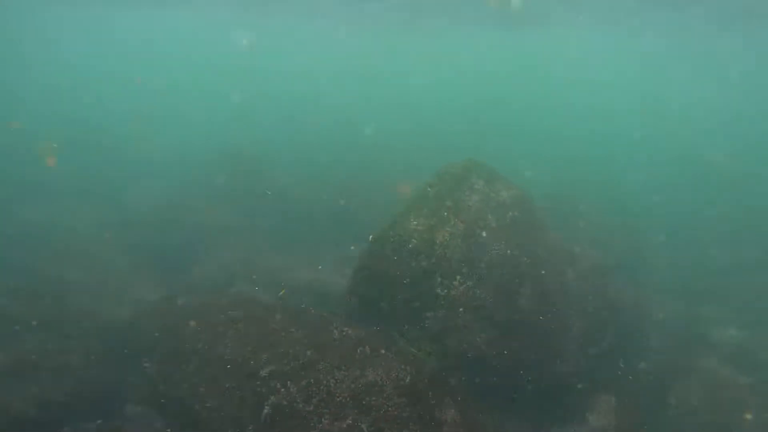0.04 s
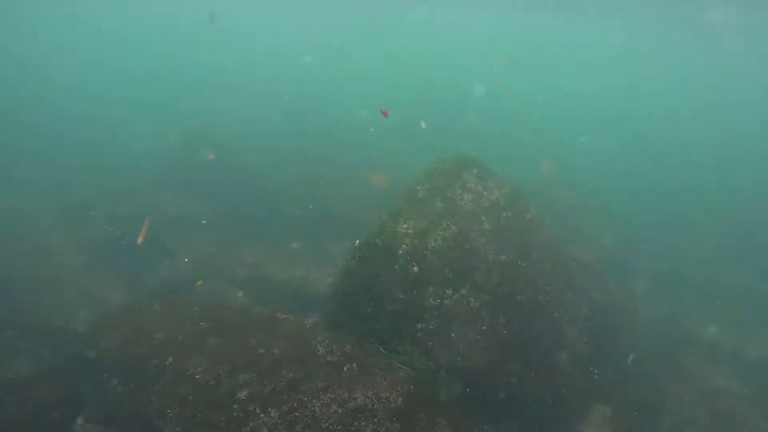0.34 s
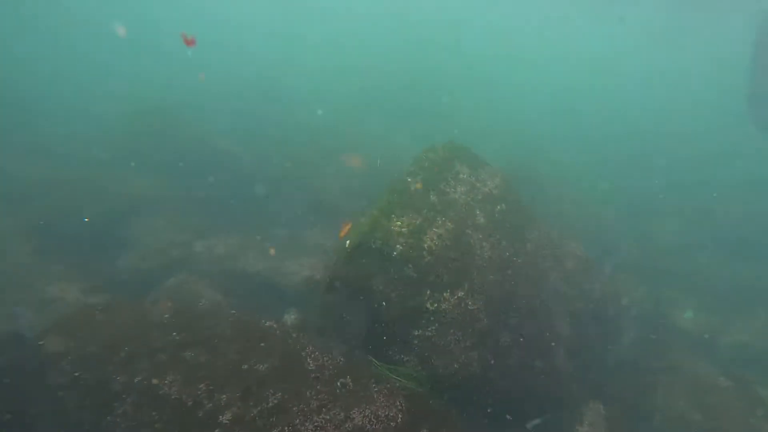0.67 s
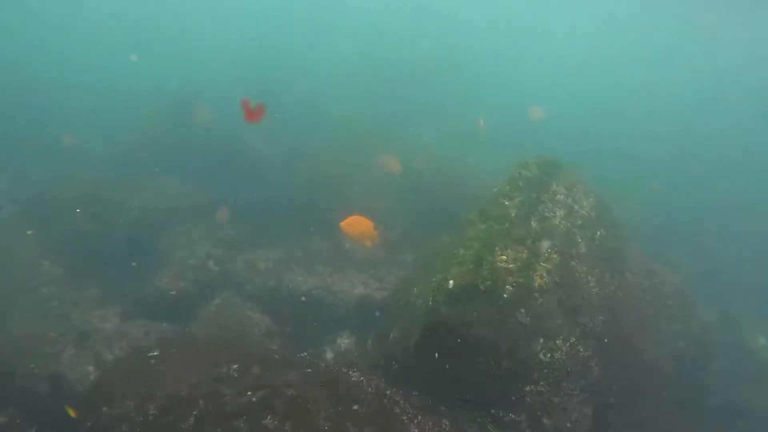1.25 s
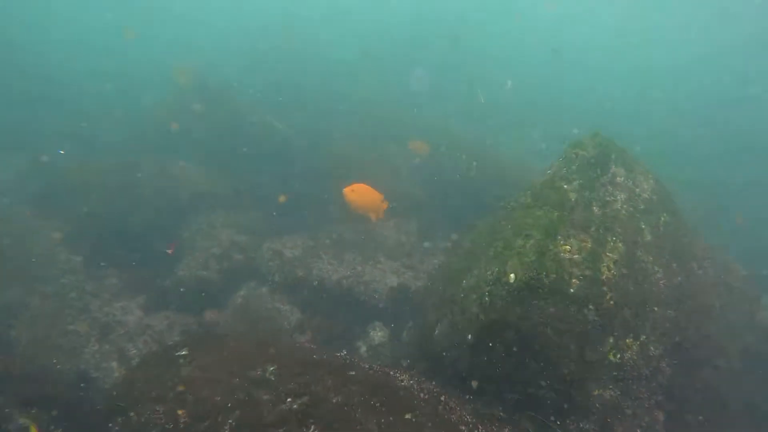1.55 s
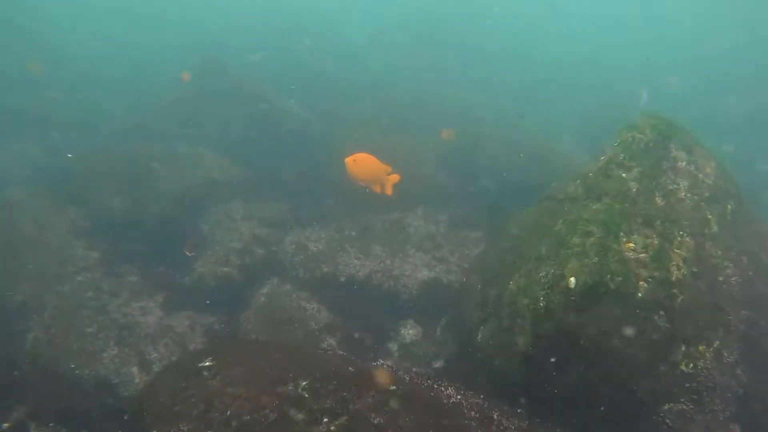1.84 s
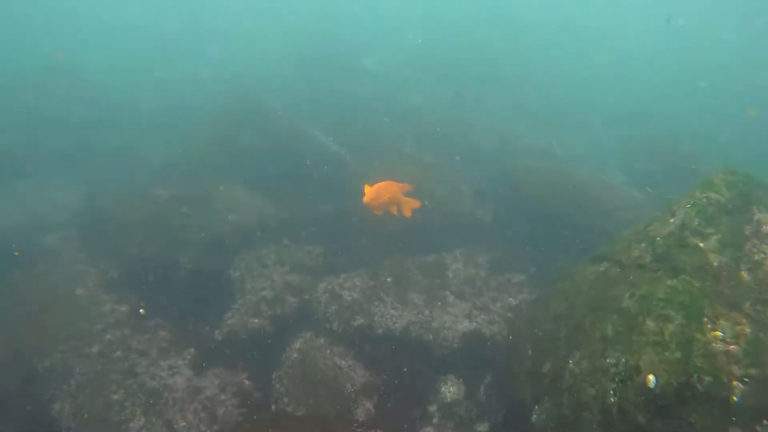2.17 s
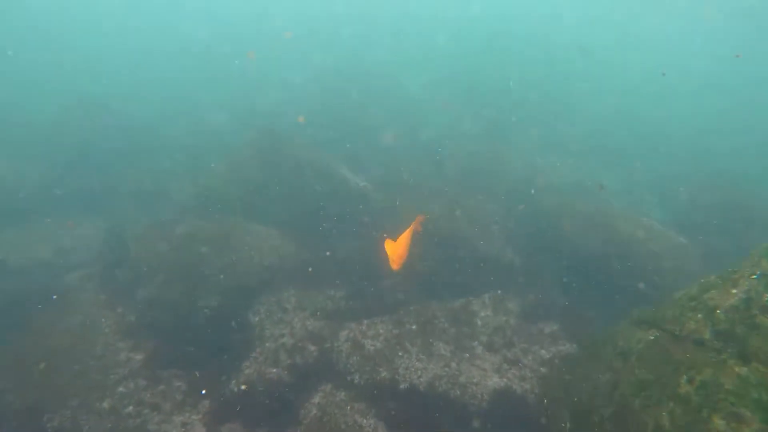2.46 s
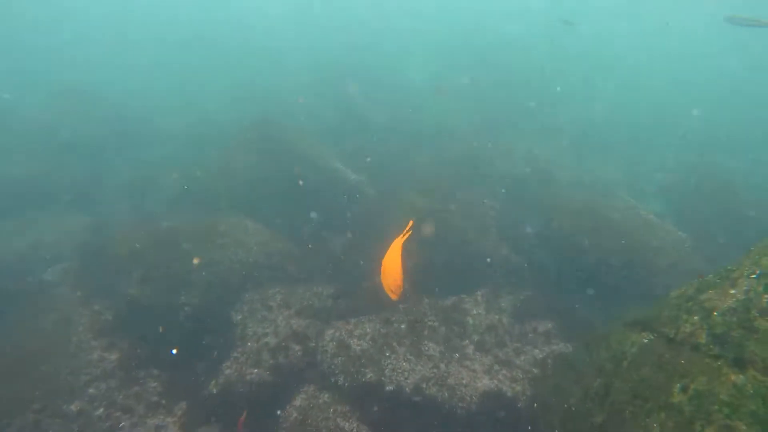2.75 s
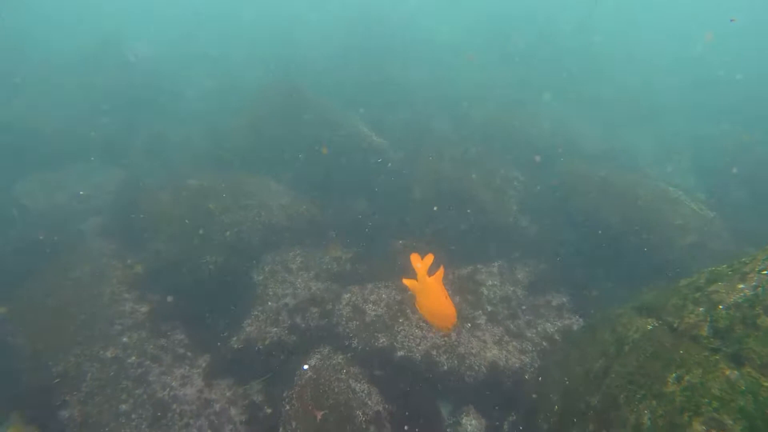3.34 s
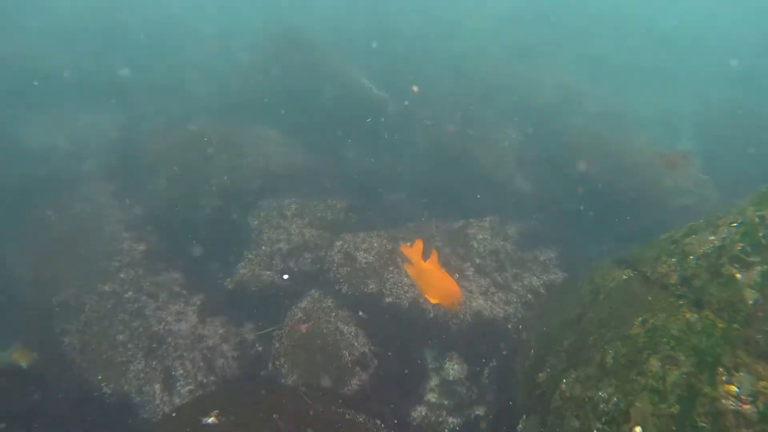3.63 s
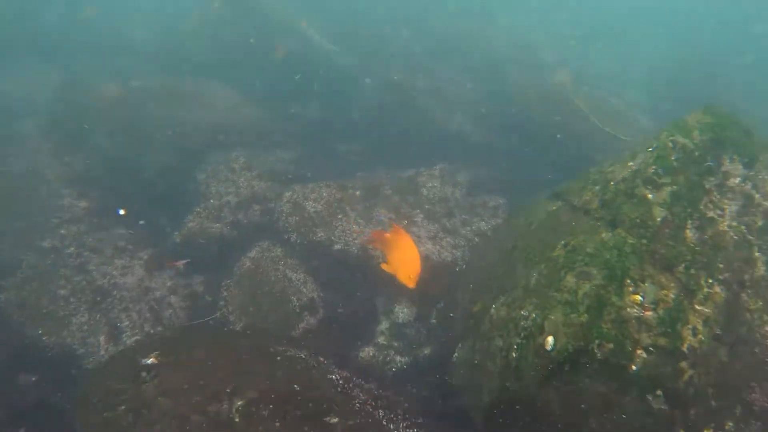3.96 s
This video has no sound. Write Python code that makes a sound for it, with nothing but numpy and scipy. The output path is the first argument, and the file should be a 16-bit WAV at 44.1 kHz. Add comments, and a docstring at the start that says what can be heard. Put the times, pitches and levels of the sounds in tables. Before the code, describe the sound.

Water rumbles and churns throughout, muffled and heard from inside a submerged camera housing. At about 1 second a gush of bubbles breaks into deep glugs, followed by a small clink near 1.4 seconds. A second glugging gush comes from 2.6 to 3 seconds. A short knock sounds near 3.5 seconds among small bubble plinks. Faint ticks on the plastic case and a light fizz are scattered all along.

```python
"""Water gushes twice and breaks into deep glugs, heard from inside a submerged camera housing.
Each gush is a dense cloud of bubbles, and each bubble is a pocket of air that rings briefly.
Small bubbles plink afterwards. Water pushing past the case makes a muffled rumble and a low churning.
Faint ticks ring the plastic case and tiny bubbles fizz and spit. There is one clink, one dry snap
and one short knock."""
import sys
import numpy as np
from scipy import signal
from scipy.fft import rfft, irfft
from scipy.io import wavfile

SR = 44100
rng = np.random.default_rng(int(sys.argv[2]) if len(sys.argv) > 2 else 0)


def store_pcm(level_fs):
    """Save levels as 16-bit WAV."""
    pcm = np.round(np.clip(level_fs, -1, 1) * 32767).astype(np.int16)
    wavfile.write(sys.argv[1], SR, np.atleast_2d(pcm).T)


N = 176400

# The notes the plastic case rings at: pitch_hz, level_db, ring_s (time to fade by 60 dB)
CASE_NOTES = [(569, 13.5, 0.044), (780, -6, 0.13), (1292, 10.5, 0.048), (1432, 2, 0.027),
              (1754, 15, 0.0089), (2296, 12.5, 0.016), (2591, 10, 0.032), (2653, -31.5, 0.013),
              (3080, -17, 0.084), (3580, -49.5, .01), (4470, -54.5, 0.0033), (5640, -48.5, .012),
              (6550, -4.5, 0.01), (7500, 8, 0.0045)]
# How loud the tiny bubbles are over time: time_s, level_db
FIZZ_LEVELS = [(0, -66), (.42, -54), (.68, -68.5), (.76, -56), (.81, -49.5), (.9, -57.5), (1.25, -55),
               (1.7, -59), (2.25, -50.5), (2.45, -59), (2.8, -50.5), (3.15, -52), (3.42, -50.5),
               (3.53, -52.5), (3.7, -50.5), (4, -51)]


def amp(db):
    """Turns decibels into a number to multiply a sound by."""
    return 10 ** (np.asarray(db) / 20)


def unit(x):
    """Scales a sound so that its average strength (rms) is 1."""
    return x / np.sqrt(np.mean(x ** 2) + 1e-20)


def level(points):
    """A volume curve through rows of time_s, level_db."""
    return amp(np.interp(np.arange(N) / SR, *np.transpose(points)))


def value_at(points, hz):
    """Looks up a pitch in rows of pitch_hz, value, blending between the rows."""
    pitches, values = np.transpose(points)
    return np.interp(np.log(hz + 1), np.log(pitches), values)


def colour(x, points):
    """Makes some pitches louder and others softer, by rows of pitch_hz, level_db."""
    hz = np.fft.rfftfreq(len(x), 1 / SR)
    return irfft(rfft(x) * amp(value_at(points, hz)), len(x))


def noise(points):
    """Steady noise of strength 1, shaped by rows of pitch_hz, level_db."""
    return unit(colour(rng.standard_normal(N), points))


def add(mix, start_s, sound):
    """Mixes a sound in at its start time."""
    part = mix[max(round(start_s * SR), 0):][:len(sound)]
    part += sound[:len(part)]


def flutter(rate_hz, size):
    """A random wobble of strength 1, in complex numbers so it shakes both volume and pitch."""
    hz = np.fft.fftfreq(16384, 1 / SR)
    weight = np.exp(-(hz / rate_hz) ** 2 / 2)
    spectrum = weight * np.exp(2j * np.pi * rng.random(len(hz))) / np.linalg.norm(weight)
    return np.resize(np.fft.fft(spectrum), size)


def fuzzy_tone(hz, width_hz, t):
    """A tone blurred into a narrow band of noise, of strength about 1."""
    return np.sqrt(2) * (flutter(width_hz, len(t)) * np.exp(2j * np.pi * hz * t)).real


def smear(x):
    """Scatters a sound randomly over a few milliseconds."""
    scatter = irfft(np.exp(2j * np.pi * rng.random(257)))
    return signal.oaconvolve(x, scatter, "same")


def ring_case(x):
    """A sound shakes the plastic case, which rings at its own notes."""
    t = np.arange(SR // 10) / SR
    ring = sum(amp(db - 60 * t / ring_s) * np.cos(2 * np.pi * hz * t) for hz, db, ring_s in CASE_NOTES)
    return signal.oaconvolve(x, ring)[:len(x)]


def ringing_note(peak_db, hz, ring_s, octaves_per_s=0, wobble=0):
    """A note swells, may slide and wobble, and dies away, the way the air in a bubble rings."""
    t = np.arange(0, ring_s + .02, 1 / SR)
    rise_s = 1.5 / hz
    swell = np.sin(np.pi / 2 * np.minimum(t / rise_s, 1)) ** 2
    fade = amp(-60 * np.maximum(t - rise_s, 0) / ring_s)
    pitch_hz = hz * 2 ** (octaves_per_s * t)
    tone = np.exp(2j * np.pi * np.cumsum(pitch_hz) / SR)
    if wobble:
        depth = wobble * min(hz / 600, 1)  # notes below 600 Hz wobble less
        tone *= 1 + depth * flutter(0.11 * hz, len(t))
    return amp(peak_db) * swell * fade * tone.imag


def far_wash():
    """Water farther off makes a faint, steady hiss."""
    # Tone of the hiss: pitch_hz, level_db
    wash_tone = [(530, -38), (900, -33), (1050, -27.5), (1260, 7.5), (1560, -3.5), (1780, 10.5),
                 (1940, -16), (2340, 3.5), (2910, -12), (3240, -2.5), (3800, -11), (5520, -15.5),
                 (9500, -15.5), (12400, -66), (20900, -120)]
    return amp(-61) * noise(wash_tone)


def surge(depth_db=2.5, slowest_hz=4.5, fastest_hz=18):
    """A volume curve that swells and dips at random several times a second."""
    t = np.arange(N) / SR
    rates_hz = np.linspace(slowest_hz, fastest_hz, 24)
    wave = sum(np.sin(2 * np.pi * (hz * t + rng.random())) for hz in rates_hz)
    return unit(amp(depth_db * unit(wave)))


def water_flow():
    """Water pushes past the case: a deep rumble, and a churning near 190 Hz that comes in surges."""
    # Tone of the rumble and of the churning: pitch_hz, level_db
    rumble_tone = [(8, -5), (22, 7), (45, 3), (65, -2.5), (90, -9.5), (125, -7), (180, -16), (260, -31),
                   (400, -31.5), (620, -36.5), (1000, -63), (2000, -72.5)]
    churn_tone = [(60, -53.5), (130, -15.5), (165, -7.5), (195, 0), (220, -7.5), (255, -22), (400, -38),
                  (900, -76)]
    # How loud each is over time: time_s, level_db
    rumble_levels = [(0, -35.5), (.35, -29), (.6, -27.5), (.9, -30), (1.06, -20), (1.2, -26.5), (1.42, -28),
                     (1.65, -29), (1.9, -27.5), (2.07, -26), (2.22, -25), (2.34, -32.5), (2.64, -27),
                     (2.95, -29.5), (3.18, -33.5), (3.42, -25.5), (3.7, -29.5), (3.84, -24.5), (4, -30.5)]
    churn_levels = [(0, -37), (.18, -41), (.45, -32), (.64, -51.5), (.75, -45.5), (.9, -55), (1.3, -47.5),
                    (1.55, -37.5), (1.68, -41.5), (1.8, -31), (2.1, -41), (2.36, -55.5), (2.55, -53.5),
                    (2.75, -33), (2.93, -39), (3.05, -54.5), (3.2, -35), (3.38, -32.5), (4, -32.5)]
    rumble = level(rumble_levels) * noise(rumble_tone)
    churn = level(churn_levels) * surge() * noise(churn_tone)
    return rumble + churn


def fizz(pops_per_s=3000, spread_db=3, rise_s=0.00089, fall_s=0.0032, pitch_count=44):
    """Tiny bubbles pop at random, each a brief fuzzy note."""
    # Tone of the fizz through the case: pitch_hz, level_db
    fizz_tone = [(330, -6.5), (620, 9), (720, -1.5), (830, 3.5), (1060, -12.5), (1310, 5.5), (1520, -10.5),
                 (1810, 1), (2020, -4.5), (2600, 3), (2950, -8), (3180, -7), (3900, -13.5), (4700, -7.5),
                 (6000, -17.5), (8000, -9), (10000, -29.5)]
    t = np.arange(SR // 30) / SR
    shape = (1 - np.exp(-t / rise_s)) ** 2 * np.exp(-t / fall_s)
    strength = amp(spread_db * np.minimum(rng.exponential(1, N), 4.5))
    strength *= rng.random(N) < pops_per_s / SR  # zero except where a pop starts
    pitches_hz = np.linspace(np.sqrt(500), np.sqrt(9000), pitch_count) ** 2
    pitch_choice = rng.integers(0, pitch_count, N)
    pops = np.zeros(N)
    for k, hz in enumerate(pitches_hz):
        pop = unit(shape * fuzzy_tone(hz, 0.092 * hz, t))
        for at in np.flatnonzero(strength * (pitch_choice == k)):
            add(pops, at / SR, strength[at] * pop)
    return level(FIZZ_LEVELS) * unit(colour(pops, fizz_tone))


def plips(per_s=28, low_hz=420, high_hz=2800):
    """Slightly larger bubbles stand out of the fizz, growing louder and softer with it."""
    out = np.zeros(N)
    for k, (late, height, softness) in enumerate(rng.random((400, 3))):
        start_s = (k + 4 * late) / per_s
        if start_s < N / SR:
            hz = low_hz * (high_hz / low_hz) ** height
            add(out, start_s, ringing_note(3.5 - 12.5 * softness, hz, ring_s=0.042, octaves_per_s=2))
    return level(FIZZ_LEVELS) * out


def spits(rise_s=.0006, fall_s=0.0047):
    """Tiny bubbles burst crisply right at the case."""
    # The nearest bursts: start_s, pitch_hz, level_db
    bursts = [(0.39, 7960, -46.5), (0.791, 7000, -53.5), (1.01, 4500, -52), (1.143, 3900, -40),
              (1.364, 7240, -50), (1.414, 11200, -61), (1.570, 7440, -52), (1.960, 8500, -50.5),
              (2.944, 7500, -53), (2.963, 8000, -48), (3.081, 4670, -49), (3.139, 4700, -51),
              (3.194, 5920, -53), (3.396, 4910, -43.5), (3.467, 7900, -53), (3.614, 4650, -47.5),
              (3.677, 4670, -48), (3.841, 6320, -58)]
    t = np.arange(SR // 30) / SR
    shape = np.minimum(t / rise_s, 1) * np.exp(-t / fall_s)
    out = np.zeros(N)
    for start_s, hz, db in bursts:
        add(out, start_s, amp(db) * shape * fuzzy_tone(hz, .09 * hz, t))
    return out


def clink(rise_s=0.0046, width_hz=300):
    """Something small and hard scrapes and rings briefly."""
    # Its bright notes: pitch_hz, level_db, ring_s
    notes = [(4500, -51, 0.054), (5780, -42.5, 0.078), (7000, -44, 0.058), (7900, -24.5, 0.03),
             (9060, -32, 0.023), (11000, -43, .012), (12500, -47, .012), (14900, -45, .012)]
    t = np.arange(SR // 10) / SR
    ring = sum(amp(db - 60 * t / ring_s) * fuzzy_tone(hz, width_hz, t) for hz, db, ring_s in notes)
    return np.minimum(t / rise_s, 1) * ring / np.sqrt(2)


def snap():
    """One thin, dry snap, only three samples long."""
    return amp(-30) * np.array([1, -2, 1])


def ticks(trim_db=-6, rise_s=0.0033, fall_s=0.0063):
    """Short scratchy ticks ring the case, each with its own brightness."""
    # Ticks on the case, before trim_db is added: start_s, low_db, middle_db, high_db
    hits = [(0.164, -55, -53, -78), (0.398, -57, -74, -72), (0.4155, -55.5, -50.5, -57),
            (0.572, -52.5, -56, -75), (0.686, -72, -57.5, -63.5), (0.8124, -61, -55, -60.5),
            (1.0192, -37, -48, -92), (1.1418, -54.5, -48.5, -64.5), (1.2172, -51, -46.5, -68),
            (1.2418, -49, -64, -82), (1.266, -49, -64, -85.5), (1.3184, -54, -57.5, -66),
            (1.357, -53, -63, -70), (1.4887, -56.5, -51.5, -66), (1.5591, -57.5, -52.5, -69),
            (1.7346, -57, -75, -86), (1.887, -68, -53, -61.5), (2.2359, -45.5, -48.5, -58.5),
            (2.2745, -51.5, -53, -71), (2.419, -79, -64, -56), (2.435, -73, -72, -61),
            (2.521, -57, -63, -70), (2.5674, -65, -50.5, -63), (2.598, -39, -53.5, -67),
            (2.887, -55, -54.5, -61.5), (3.0273, -63, -53, -73), (3.3009, -56, -49.5, -64),
            (3.4843, -37.5, -46.5, -53), (3.5483, -51, -71, -84), (3.6655, -47, -55, -75),
            (3.8016, -47, -66, -65), (3.9857, -49, -68, -61)]
    # The low, middle and high pitch ranges: from_hz, to_hz
    ranges = [(1100, 2100), (2100, 3400), (3600, 7500)]
    filters = [signal.butter(3, edges, "band", fs=SR, output="sos") for edges in ranges]
    t = np.arange(4096) / SR
    shape = np.minimum(t / rise_s, 1) * np.exp(-t / fall_s)
    out = np.zeros(N)
    for start_s, *levels_db in hits:
        ring = ring_case(shape * rng.standard_normal(len(t)))
        for db, band in zip(levels_db, filters):
            add(out, start_s, amp(db + trim_db) * unit(signal.sosfilt(band, ring)))
    return out


def bubbles_and_knock():
    """Bubbles glug and plink, and one short knock rings three notes together near 3.49 s."""
    # Notes of the bubbles and the knock: start_s, peak_db, pitch_hz, ring_s, slide_octaves_per_s
    notes = [(.822, -23.5, 143.7, 0.11, -4), (0.973, -18, 159, 0.12, -6), (0.98, -23, 507.7, 0.21, 3),
             (1.004, -9, 134.6, 0.092, -5.5), (1.007, -25.5, 878, 0.098, -5),
             (1.027, -24.5, 647, 0.12, -8.5), (1.042, -17, 334, 0.13, 12), (1.066, -15, 411, 0.025, -20),
             (1.074, -13.5, 352, .035, -15), (1.085, -21, 206, 0.044, 9.5), (1.112, -7.5, 175, 0.16, 3.5),
             (1.188, -29, 542, 0.048, -33.5), (1.187, -17, 179, 0.087, 7), (1.216, -39, 548, .035, -2),
             (1.217, -40, 798, 0.16, 2.5), (1.247, -33, 516, 0.042, 7), (1.262, -30.5, 350, 0.033, -12),
             (1.263, -17.5, 137, 0.015, 11.5), (1.315, -26.5, 347, 0.025, -19),
             (1.356, -40, 840, 0.051, 10), (1.359, -33.5, 1307, 0.049, -3.5), (2.273, -39, 781, 0.17, 2),
             (2.566, -34.5, 544, 0.067, -9), (2.58, -8.5, 179.3, 0.095, 6), (2.623, -10.5, 159.3, 0.13, -3),
             (2.625, -32, 589, 0.083, -2), (2.659, -16, 412, 0.025, -5), (2.66, -3.5, 172.1, 0.12, 3),
             (2.726, -33, 844, 0.13, 2.5), (2.76, -32, 517, 0.047, 10), (2.772, -21.5, 201, 0.077, 4),
             (2.846, -35.5, 697, 0.053, 7), (2.866, -24.5, 186.4, 0.24, -1), (2.936, -22, 170, 0.12, 0),
             (3.418, -41, 878, 0.082, 5.5), (3.451, -30.5, 612, 0.11, 3.5), (3.485, -25, 619, 0.038, 8),
             (3.486, -23, 877, 0.029, 0), (3.487, -25.5, 1304, 0.038, -3.5), (3.665, -42.5, 830, 0.17, -1),
             (3.739, -35.5, 667, 0.09, -3.5), (3.749, -42.5, 900, 0.061, 1.5),
             (3.786, -32, 801, 0.12, -2.5), (3.943, -34.5, 756, 0.12, 7.5), (3.945, -30, 611, 0.22, 0),
             (3.986, -31, 573, 0.14, 1)]
    out = np.zeros(N)
    for start_s, *settings in notes:
        add(out, start_s, ringing_note(*settings, wobble=0.47))
    return out


def spray(t, snaps_per_s=2000, spread_db=3, rise_s=0.049, fade_db_per_s=104):
    """A burst of tiny snaps, blurred by the water and heard through the case."""
    # Tone of the spray: pitch_hz, level_db
    spray_tone = [(500, -4), (1300, 1), (3000, -1), (4500, -5), (8000, -6.5), (11000, -13.5)]
    strength = amp(spread_db * np.minimum(rng.exponential(1, N), 5))
    snaps = strength * rng.choice([-1, 1], N) * (rng.random(N) < snaps_per_s / SR)
    crackle = unit(colour(ring_case(smear(snaps)), spray_tone))
    swell = np.minimum(0.18 + t / rise_s, 1)
    fade = amp(-fade_db_per_s * np.maximum(t - rise_s, 0))
    return swell * fade * crackle[:len(t)]


def bubble_cloud(length_s, first_top_hz, last_top_hz, low_hz=103.7, sink_s=.15, count=420):
    """Hundreds of brief bubbles crowd together, and their highest pitch sinks at the start."""
    cloud = np.zeros(int(length_s * SR))
    for k, (late, height, strength, flip) in enumerate(rng.random((count, 4))):
        start_s = (k + late) / count * length_s
        top_hz = np.interp(start_s, [0, sink_s], [first_top_hz, last_top_hz])
        hz = low_hz * (top_hz / low_hz) ** height
        add(cloud, start_s, np.sign(flip - .5) * ringing_note(8 * strength, hz, ring_s=0.015))
    return unit(cloud)


def gushes(length_s=0.54, ring_db=-40.5, ring_fade_db_per_s=40.5):
    """Water gushes as a cloud of bubbles, with a spray of snaps and the hollow ring of the case."""
    # Two gushes: start_s, rise_s, hold_s, fade_db_per_s, level_db, first_top_hz, last_top_hz, spray_db
    bursts = [(0.966, 0.078, 0.06, 207, -21.5, 1105, 306, -39.5),
              (2.559, 0.0085, 0.12, 147, -28.5, 638, 498, -44)]
    t = np.arange(int(length_s * SR)) / SR
    lowest_case_hz = CASE_NOTES[0][0]
    out = np.zeros(N)
    for start_s, rise_s, hold_s, fade_db_per_s, db, first_top_hz, last_top_hz, spray_db in bursts:
        swell = np.minimum(0.06 + t / rise_s, 1)
        fade = amp(-fade_db_per_s * np.maximum(t - rise_s - hold_s, 0))
        cloud = amp(db) * fade * bubble_cloud(length_s, first_top_hz, last_top_hz)
        snaps = amp(spray_db) * spray(t)
        ring = amp(ring_db - ring_fade_db_per_s * t) * fuzzy_tone(lowest_case_hz, width_hz=60, t=t)
        add(out, start_s, swell * (cloud + ring) + snaps)
    return out


def scene():
    """All sounds meet at the case; low sounds are alike in both ears and high ones spread a little."""
    # How much of the sound spreads to the sides: pitch_hz, level_db
    spread = [(30, -59.5), (200, -45), (450, -30), (700, -23), (1100, -9), (1300, -21), (2000, -26.5),
              (4000, -18.5), (6000, -19), (10000, -10)]
    middle = water_flow() + fizz() + plips() + far_wash()
    middle += gushes() + bubbles_and_knock() + ticks() + spits()
    add(middle, start_s=1.3785, sound=clink())
    side = colour(smear(middle), spread) + amp(-15) * fizz()
    add(middle, start_s=3.098, sound=snap())
    return np.array([middle + side, middle - side])


def record(dry, top_hz=15900):
    """The case muffles high pitches, and its two microphone openings each colour the sound a little."""
    # How much louder the left opening is: pitch_hz, left_minus_right_db
    balance = [(60, .1), (400, .2), (600, .7), (800, -1.2), (1100, -3), (1250, 2), (1600, .8), (2100, 4),
               (3200, .5), (4800, -1.8), (7000, 1)]
    # How far the left wave runs ahead of the right: pitch_hz, lead_radians
    left_lead = [(40, .02), (200, .04), (450, .03), (780, .3), (1050, .2), (1300, -.1), (1550, .25),
                 (1950, .45), (2800, .1), (4000, .2), (6000, 0)]
    # Muffling by the case: pitch_hz, level_db
    muffling = [(6000, -3), (8000, -15), (9500, -16.5), (11000, -16), (13000, -22)]
    hz = np.fft.rfftfreq(N, 1 / SR)
    left = amp(value_at(balance, hz) / 2) * np.exp(.5j * value_at(left_lead, hz))
    openings = np.array([left, 1 / left])
    muffled = irfft(rfft(dry) * amp(value_at(muffling, hz)) * openings, N)
    treble_cut = signal.firwin(255, top_hz, window=("kaiser", 8), fs=SR)
    return signal.oaconvolve(muffled, treble_cut[None], "same")


dry = scene()
out = record(dry)
store_pcm(out)
```